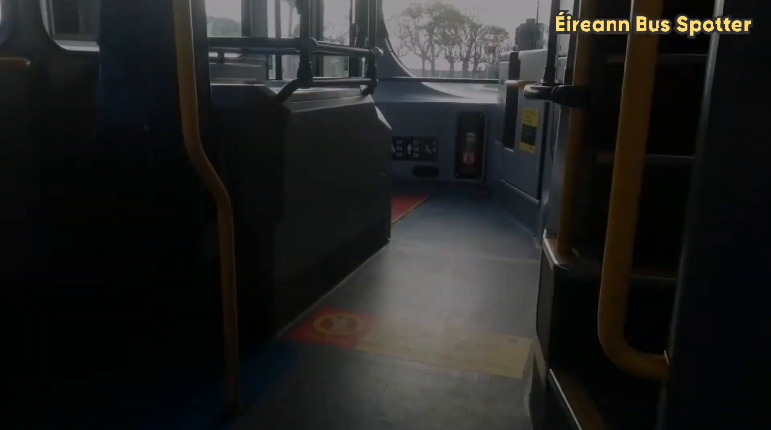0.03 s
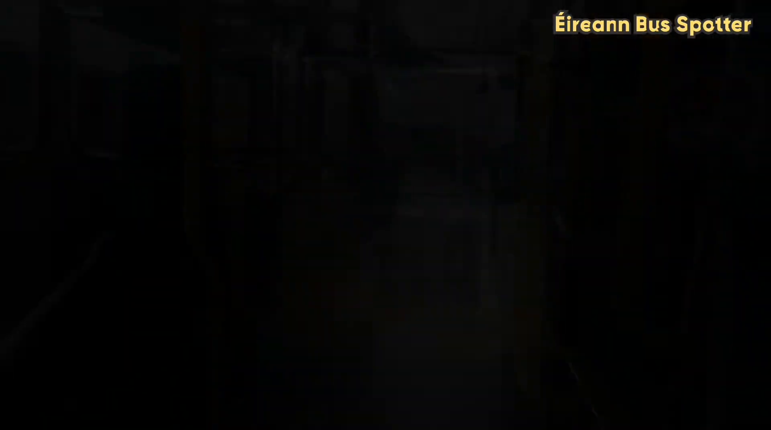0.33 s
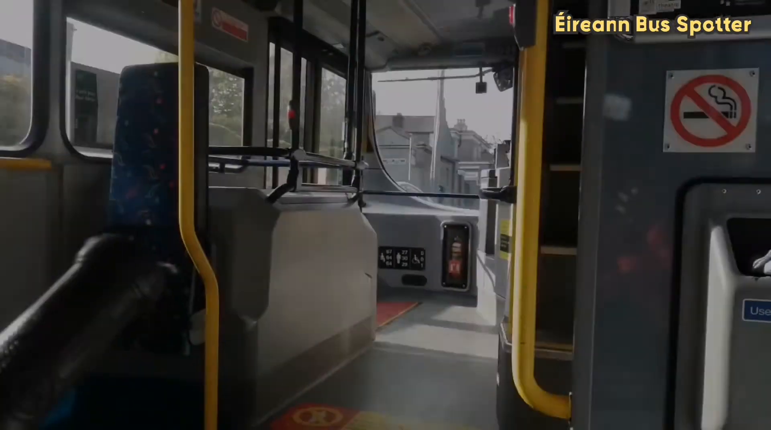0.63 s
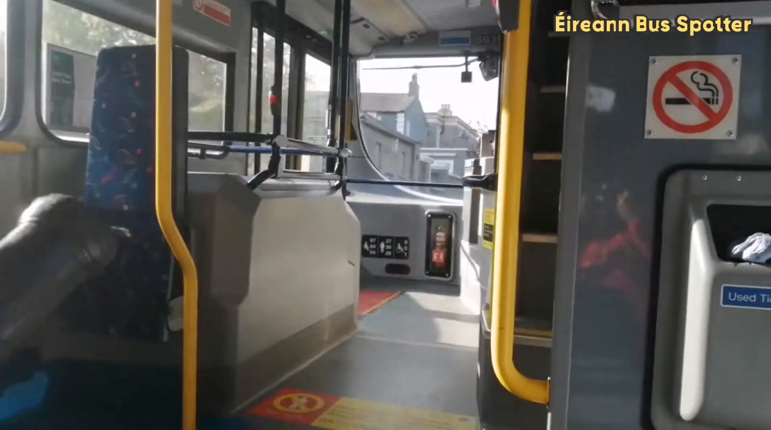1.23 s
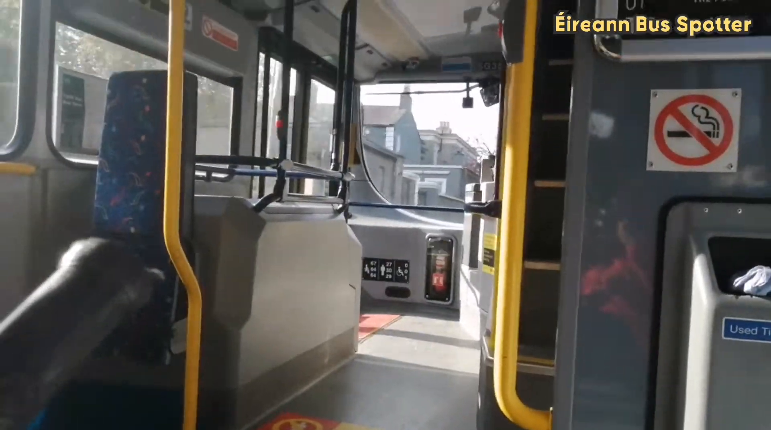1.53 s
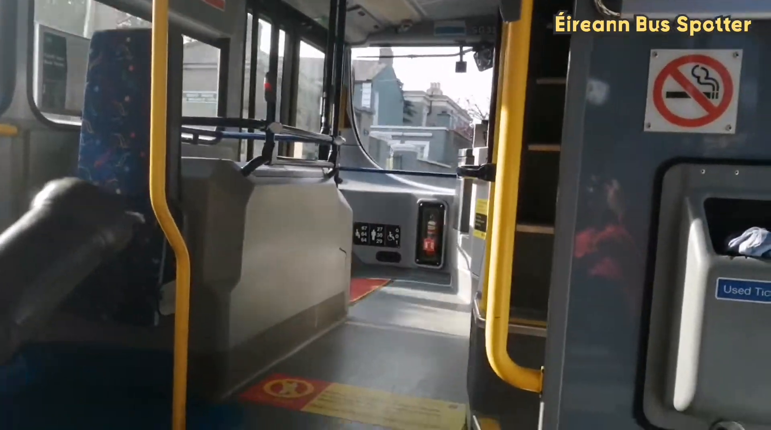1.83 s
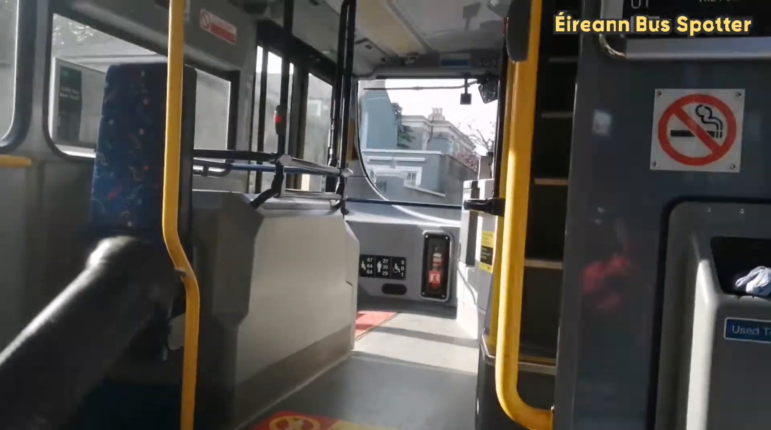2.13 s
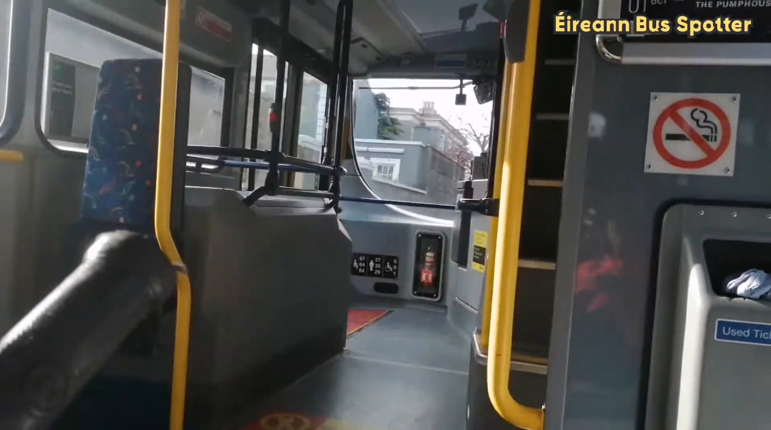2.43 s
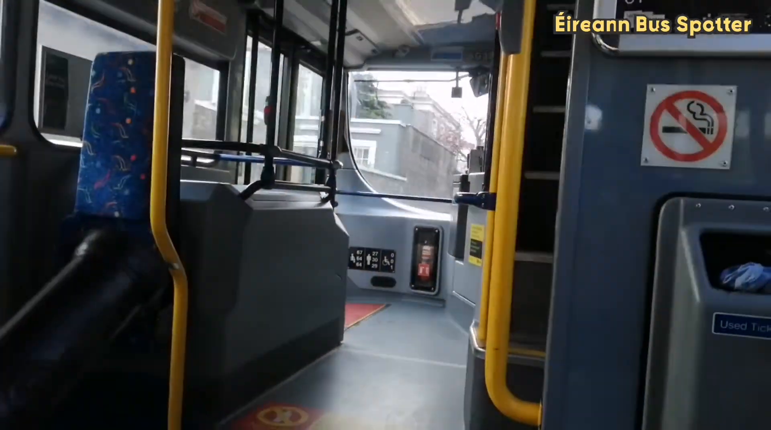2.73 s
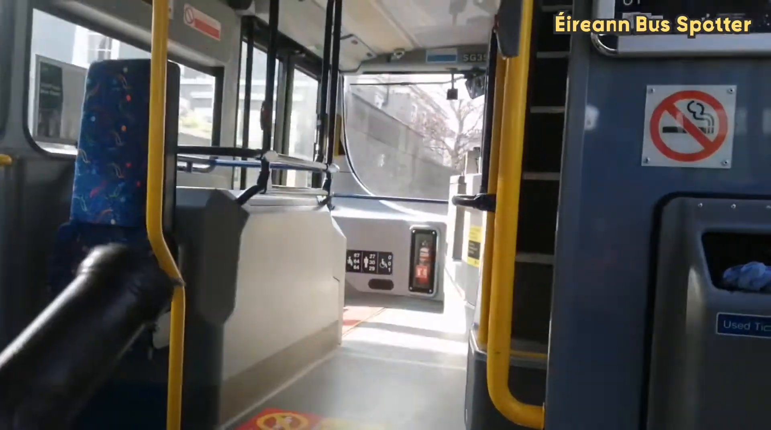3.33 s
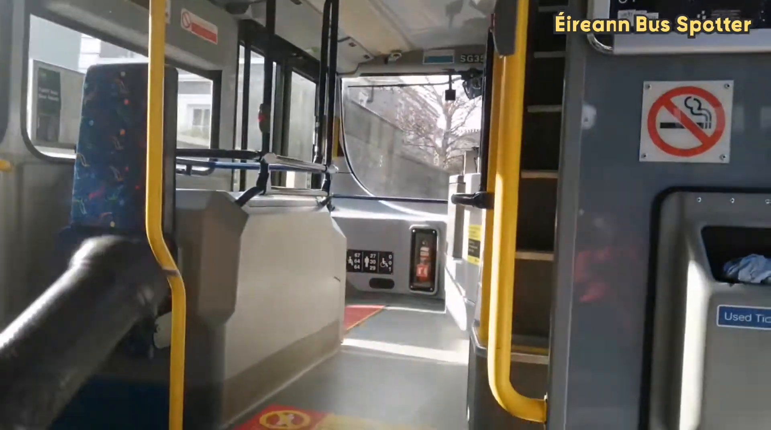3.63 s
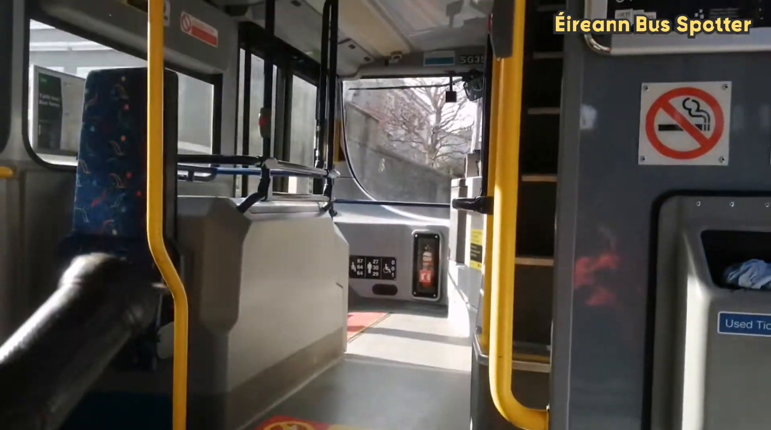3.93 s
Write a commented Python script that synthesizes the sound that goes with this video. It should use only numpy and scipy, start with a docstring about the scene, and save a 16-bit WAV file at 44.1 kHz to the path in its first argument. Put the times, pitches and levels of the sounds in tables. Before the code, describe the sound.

Loose metal fittings rattle inside a moving bus, cutting in at about 0.3 seconds over low tyre rumble and engine hum. The chatter is light at first, with small knocks and a deep body boom around 1.3 seconds. From about 2.4 to 3.6 seconds, rough road brings louder ringing clacks, buzzing, knocking wall panels and floor thuds. The rattle eases briefly before another jolt near 4 seconds.

```python
"""Loose fittings rattle inside a moving double-deck bus, heard from the lower saloon.
Small impacts keep the metal chattering and ringing; over a rough patch of road it clacks while the
buzzing wall panels knock and the floor thuds. Fittings and panels reverberate in a small hard cabin.
Beneath them lie tyre rumble, the harmonic hum of the engine, the boom of the body on its springs
and brief drumming of floor and roof. The sound cuts in just after the start."""
import sys
import numpy as np
from scipy import signal
from scipy.fft import rfft, irfft
from scipy.io import wavfile

SR = 44100
rng = np.random.default_rng(int(sys.argv[2]) if len(sys.argv) > 2 else 0)


def wav_out(sig):
    """Save sig, one row per channel (or a flat mono array), as 16-bit PCM at SR to the path in sys.argv[1]."""
    wavfile.write(sys.argv[1], SR, np.round(np.clip(np.atleast_2d(sig).T, -1, 1) * 32767).astype(np.int16))


N = 176400
TIME = np.arange(N) / SR

# Spectral densities of tyre rumble and tyre roar: f/Hz, relative level/dB
RUMBLE_SPECTRUM = [(10, -11.5), (20, -1), (35, 4.5), (62, -3.5), (85, -0.5), (125, -5), (180, -5.5),
                   (250, -8.5), (310, -13.5), (420, -14.5), (560, -23.5), (780, -29), (1100, -38),
                   (1500, -40), (2500, -40), (4000, -46.5), (8000, -57.5)]
ROAR_SPECTRUM = [(100, -22), (300, -4.5), (480, 0.5), (750, 0.5), (1000, -6), (1500, -17.5), (3000, -23),
                 (8000, -36.5)]
# Envelopes of tyre rumble and tyre roar: t/s, level/dB
RUMBLE_LEVEL = [(.27, -34.5), (1.15, -36), (1.8, -37), (2.3, -35), (3, -36.5), (3.7, -35.5), (3.85, -37.5),
                (4, -37.5)]
ROAR_LEVEL = [(.27, -54), (.8, -52.5), (1.15, -47.5), (1.6, -50.5), (1.8, -48), (1.95, -51), (2.25, -52),
              (2.7, -51.5), (3.4, -51.5), (3.85, -52.5), (4, -48)]
# Envelope of the body's boom: t/s, level/dB
BOOM_LEVEL = [(.27, -57.5), (1.1, -52.5), (1.36, -29.5), (1.58, -55), (1.95, -40.5), (2.15, -38),
              (2.5, -39), (3.05, -35), (3.35, -34.5), (3.6, -43.5), (4, -32)]
# Running of the engine: t/s, firing rate/Hz, fundamental level/dB, relative overtone level/dB
ENGINE_RUN = [(.27, 40.81, -38.5, -59), (.75, 41.39, -40, -46), (.92, 43.84, -52.5, -43.5),
              (1.18, 45.72, -32.5, -40.5), (1.3, 50.07, -47, -43), (1.45, 53.1, -38, -44),
              (1.95, 52.28, -39, -42), (2.55, 50.23, -37.5, -45.5), (2.85, 48.05, -46.5, -50),
              (3.25, 45.95, -40, -42), (4, 44.98, -48, -41.5)]
# Engine overtones: harmonic number, relative level/dB
ENGINE_HARMONICS = [(2, 1), (3, -7), (4, -8.5), (5, -13.5), (6, -14.5), (8, -14.5), (9, -18.5), (10, -18.5)]
# Swells of drumming: peak t/s, f/Hz, level/dB, 1/e half-width/s
DRUM_SWELLS = [(0.495, 168, -40.5, 0.1), (0.78, 128, -41.5, 0.072), (.94, 70, -38, .05),
               (2.19, 80, -35.5, 0.088), (2.626, 62, -38, 0.049), (2.752, 262, -46, 0.054),
               (2.975, 183, -40.5, 0.14), (3.31, 95, -38, 0.055), (3.634, 177, -43.5, .12),
               (3.724, 100, -36.5, 0.06)]
# Shaking of the cabin: t/s, chatter level/dB, panel buzz level/dB
SHAKE_LEVELS = [(.27, -54, -51.5), (.37, -50, -48), (.6, -59, -62), (.76, -49, -56.5), (.84, -56, -58),
                (1.22, -55, -58), (1.36, -51, -59), (1.68, -54.5, -61), (1.85, -51, -69),
                (2.02, -53, -68.5), (2.22, -49.5, -65), (2.33, -49.5, -63), (2.52, -50.5, -52.5),
                (2.72, -45.5, -53), (2.80, -48, -57), (2.86, -43, -50), (2.96, -42, -49),
                (3.08, -47, -45.5), (3.27, -50, -55.5), (3.47, -52.5, -40.5), (3.62, -50, -48),
                (3.76, -50.5, -62), (3.88, -59.5, -52.5), (3.96, -47, -49)]
# Chatter of a second, brighter fitting: t/s, level/dB
BRIGHT_LEVEL = [(.27, -58.5), (.6, -66.5), (.76, -58.5), (1.3, -68), (2, -65), (2.5, -62.5), (2.7, -55),
                (2.98, -49.5), (3.1, -52), (3.28, -50), (3.46, -43.5), (3.62, -53), (3.85, -58),
                (3.96, -53.5)]
# Road jolts: t/s, relative levels of clack/dB, knock/dB and thud/dB, 1/e time of the bounces/s
ROAD_JOLTS = [(1.297, -21, -24, -27, 0.0098), (1.404, -25, -34, -29, .014),
              (1.874, -19.5, -45.5, -28, 0.0091), (2.192, -18.5, -25, -20.5, .01),
              (2.259, -41, -18.5, -15.5, 0.0075), (2.423, -17.5, -11, -8, 0.016),
              (2.726, -14, -16, -9.5, 0.013), (2.818, -4, -6.5, -9, .006), (2.910, -6.5, -9, -13.5, 0.011),
              (2.991, -4, -7, -12.5, .012), (3.163, -16, -31, -21, .01), (3.33, -14.5, -16.5, -25, .01),
              (3.370, -12, -13, -13.5, .02), (3.434, -16.5, -12, -10, 0.03), (3.468, -10.5, -9, -4.5, .016),
              (3.547, -17, -20, -26, 0.0091), (3.966, -16, -19, -9.5, 0.015)]
# Responses of hollow floor, wall panels, fittings and brighter fitting: f/Hz, relative level/dB
FLOOR_SPECTRUM = [(60, -12), (180, -4.5), (280, 0.5), (430, 3.5), (560, -11), (850, -9), (1200, -22.5),
                  (1700, -18), (2500, -29.5), (7000, -38.5)]
PANEL_SPECTRUM = [(60, -25.5), (200, 2.5), (430, 3), (700, -3), (1000, -4), (1500, -10.5), (2400, -10.5),
                  (3200, -7.5), (3800, -17.5), (5000, -10), (6500, -5), (7700, -34)]
FITTING_SPECTRUM = [(300, -41.5), (1500, -16.5), (2400, -17.5), (3000, -18.5), (3280, -6), (3500, -19),
                    (3900, -17), (4400, -9), (5200, 1), (5700, 1.5), (6100, -3), (6500, -6), (7200, -13.5),
                    (7700, -17)]
BRIGHT_SPECTRUM = [(1000, -39), (3000, -12), (4500, -19.5), (5600, -11), (6100, 1), (6500, 4.5),
                   (7100, 1.5), (7700, -17.5)]
# Normal modes of the metal fittings: f/Hz, relative level/dB, T60/s
METAL_MODES = [(1976, -13, .25), (2530, -10, .25), (2840, -9, 0.44), (3182, -10.5, 0.16), (4780, -9, 0.22),
               (5400, -4, 0.16), (5500, -1, 0.11), (5800, 1.5, .2), (6360, -7, 0.11), (6450, -2.5, .2),
               (7130, -6, .2)]
# Reverberation time of the cabin: f/Hz, T60/s
CABIN_T60 = [(150, .3), (1000, 0.33), (3000, 0.16), (7000, 0.12)]


def amp(db):
    """Amplitude ratio of a level in decibels."""
    return 10 ** (np.asarray(db) / 20)


def unit_rms(x):
    """Normalisation to an rms of 1."""
    return x / np.sqrt(np.mean(x ** 2) + 1e-20)


def curve(rows, column=1):
    """Linear interpolation of one table column in time."""
    rows = np.array(rows)
    return np.interp(TIME, rows[:, 0], rows[:, column])


def spectrum(points, hz):
    """Interpolation of a table on a logarithmic frequency axis."""
    f, value = np.transpose(points)
    return np.interp(np.log(hz + 1), np.log(f), value)


def wander(rate_hz):
    """Low-pass Gaussian noise: a smooth fluctuation of rms 1, up to about the given rate."""
    hz = np.fft.rfftfreq(N, 1 / SR)
    low_pass = np.exp(-(hz / rate_hz) ** 2) * (hz > 0)
    return unit_rms(irfft(rfft(rng.standard_normal(N)) * low_pass, N))


def response(points, size=4096):
    """Minimum-phase impulse response of unit energy with the given spectrum."""
    log_gain = np.log(amp(spectrum(points, abs(np.fft.fftfreq(size, 1 / SR)))))
    h = np.fft.ifft(np.exp(np.conj(signal.hilbert(log_gain)))).real[:size // 2]
    return h / np.linalg.norm(h)


def through(x, h):
    """Linear filtering: convolution with the impulse response h."""
    return signal.fftconvolve(x, h)[:N]


def cabin(x, places=6, reverb_to_direct_db=2):
    """Reverberation: glass and panelling reflect a sound that shifts among several places."""
    shares = np.array([wander(60) for _ in range(places)])
    shares /= np.linalg.norm(shares, axis=0)
    reverb = np.zeros(N)
    for share in shares:
        hz, t, noise = signal.stft(rng.standard_normal(SR // 2), SR, nperseg=256)
        decay = 1e3 ** (-t / spectrum(CABIN_T60, hz)[:, None])
        tail = signal.istft(noise * decay, SR, nperseg=256)[1]
        tail *= np.minimum(np.arange(len(tail)) / SR / 0.0025, 1)  # reflections build up in 2.5 ms
        reverb += through(x * share, tail / np.linalg.norm(tail))
    gain = amp(reverb_to_direct_db)
    return (x + gain * reverb) / np.hypot(1, gain)


def tyres():
    """Structure-borne noise: rumble and roar cross the floor, modulated by the grain of the asphalt."""
    hz = np.fft.rfftfreq(N, 1 / SR)
    rumble = unit_rms(irfft(rfft(rng.standard_normal(N)) * amp(spectrum(RUMBLE_SPECTRUM, hz)), N))
    roar = through(rng.standard_normal(N), response(ROAR_SPECTRUM))
    rumble *= amp(curve(RUMBLE_LEVEL) + 0.59 * wander(34))
    roar *= amp(curve(ROAR_LEVEL) + 1.1 * wander(60))
    return rumble + roar


def wavering_phase(hz, depth, rate_hz):
    """Frequency modulation: phase is the integral of a randomly drifting frequency."""
    return 2 * np.pi * np.cumsum(hz * (1 + depth * wander(rate_hz))) / SR


def body_boom(resonance_hz=26.2):
    """Mass-spring resonance: the body sways on its springs in its lowest mode."""
    phase = wavering_phase(resonance_hz, depth=0.025, rate_hz=3.6)
    return np.sqrt(2) * amp(curve(BOOM_LEVEL) + 1.4 * wander(3.9)) * np.sin(phase)


def engine():
    """Periodic excitation: the firing gives a fundamental and a series of wavering harmonics."""
    phase = wavering_phase(curve(ENGINE_RUN), depth=0.0069, rate_hz=5.9)
    overtones = sum(amp(db + 3.1 * wander(5)) * np.sin(k * phase + 0.42 * wander(8))
                    for k, db in ENGINE_HARMONICS)
    overtones *= amp(curve(ENGINE_RUN, column=3) - 4)
    fundamental = amp(curve(ENGINE_RUN, column=2) + 0.79 * wander(6.6)) * np.sin(phase)
    return np.sqrt(2) * (fundamental + overtones)


def sheet_drumming():
    """Plate vibration: floor and roof sheets sound in brief low swells as the body flexes."""
    out = np.zeros(N)
    for peak_s, hz, db, half_width_s in DRUM_SWELLS:
        phase = wavering_phase(hz, depth=0.035, rate_hz=19.6)
        swell = np.exp(-((TIME - peak_s) / half_width_s) ** 2)
        out += amp(db) * swell * np.sin(phase)
    return np.sqrt(2) * out


def contacts(per_s, spread_db):
    """Poisson process: tiny independent impacts of uneven strength, rms 1."""
    strength = amp(spread_db * np.minimum(rng.exponential(1, N), 4))
    polarity = rng.choice([-1., 1.], N)
    return unit_rms(strength * polarity * (rng.random(N) < per_s / SR))


def jolts(column, bounces_per_s=1300):
    """Impulsive excitation: each jolt is a first impact and a short run of weakening bounces."""
    out = np.zeros(N)
    t = np.arange(SR // 10) / SR
    for jolt in ROAD_JOLTS:
        start_s, db, bounce_s = jolt[0], jolt[column], jolt[4]
        touching = rng.random(len(t)) < bounces_per_s / SR
        hits = rng.standard_normal(len(t)) * touching * np.exp(-(t / bounce_s) ** 2)
        hits[0] = 1.96  # first impact, about twice a typical early bounce
        span = out[round(start_s * SR):][:len(t)]
        span += (amp(db) * hits / np.linalg.norm(hits))[:len(span)]
    return out


def panels_and_floor():
    """Forced vibration: wall panels buzz on their frames; jolts knock them and make the floor thud."""
    buzz = contacts(per_s=700, spread_db=4) * amp(curve(SHAKE_LEVELS, column=2) + wander(30))
    knocks = amp(-1.5) * jolts(column=2)
    thuds = amp(-3.5) * through(jolts(column=3), response(FLOOR_SPECTRUM))
    return through(buzz + knocks, response(PANEL_SPECTRUM)) + thuds


def metal_ring(impacts, gain_db=-12):
    """Modal decay: struck metal rings as a sum of exponentially damped sinusoids."""
    t = np.arange(SR // 4) / SR
    modes = sum(amp(db) * 1e3 ** (-t / t60) * np.sin(2 * np.pi * hz * t) for hz, db, t60 in METAL_MODES)
    return through(impacts, amp(gain_db) * modes / np.linalg.norm(modes))


def loose_fittings():
    """Impact noise: loose metal parts chatter in bursts and clack on the jolts; the nearest ring."""
    chatter = contacts(per_s=1000, spread_db=3) * amp(curve(SHAKE_LEVELS) + 1.5 * wander(27))
    bright_chatter = contacts(per_s=1000, spread_db=3.5) * amp(curve(BRIGHT_LEVEL) + 1.2 * wander(27))
    clacks = amp(-0.5) * jolts(column=1)
    bright_clacks = amp(-8) * jolts(column=1)
    rattle = through(chatter + clacks, response(FITTING_SPECTRUM))
    rattle += through(bright_chatter + bright_clacks, response(BRIGHT_SPECTRUM))
    return cabin(rattle) + metal_ring(amp(-5) * (chatter + bright_chatter) + clacks)


def scene():
    """Superposition: the low background and the rattles add in one channel."""
    background = engine() + body_boom() + tyres() + sheet_drumming()
    return (background + loose_fittings() + cabin(panels_and_floor()))[None]


def record(dry, start_s=0.273, fade_in_s=0.005, cutoff_hz=7470):
    """Gating and band limiting: the sound cuts in after a short silence and is low-pass filtered."""
    gate = np.clip((TIME - start_s) / fade_in_s, 0, 1)
    low_pass = signal.firwin(261, cutoff_hz, window=("kaiser", 8), fs=SR)
    return signal.oaconvolve(dry * gate, low_pass[None], "same")


dry = scene()
out = record(dry)
wav_out(out)
```